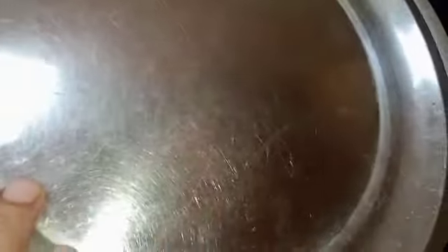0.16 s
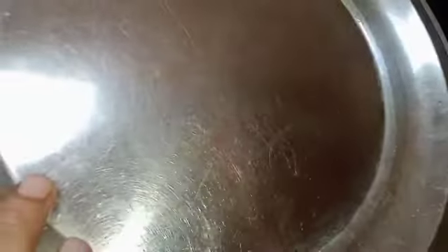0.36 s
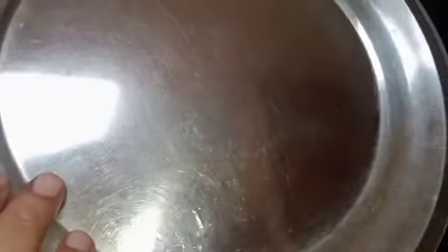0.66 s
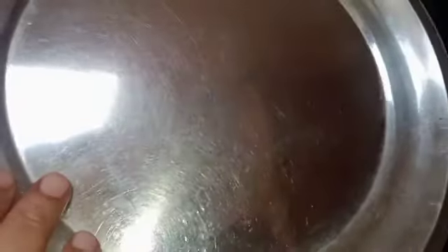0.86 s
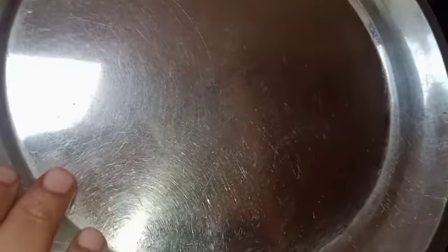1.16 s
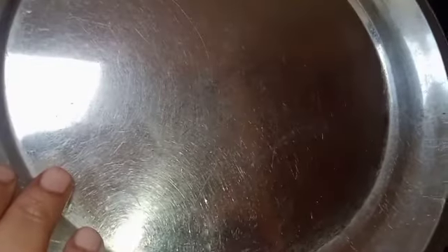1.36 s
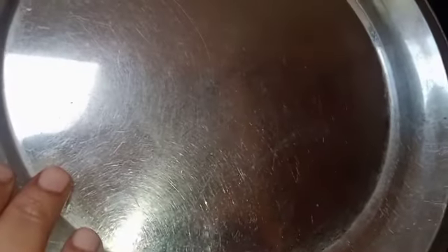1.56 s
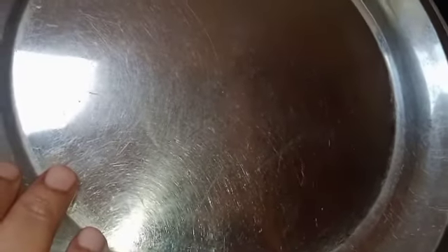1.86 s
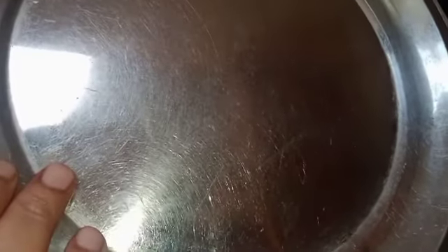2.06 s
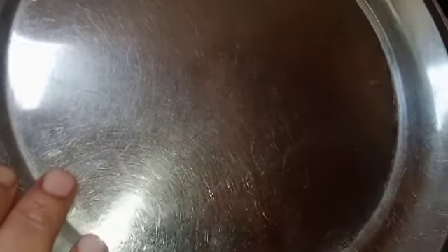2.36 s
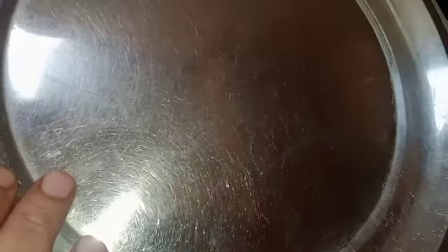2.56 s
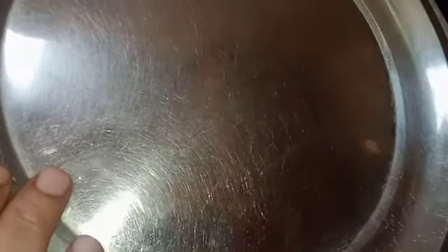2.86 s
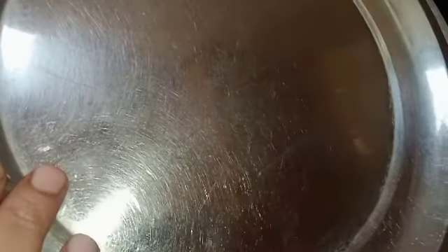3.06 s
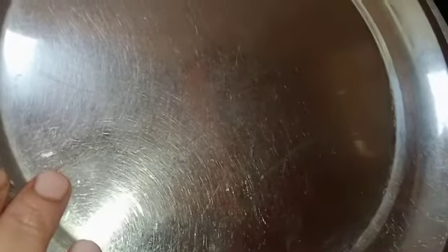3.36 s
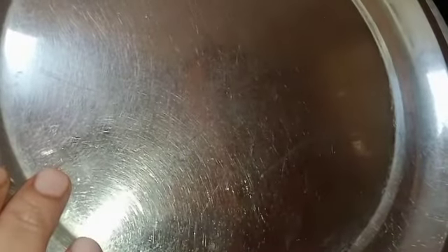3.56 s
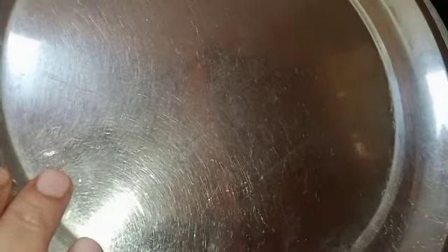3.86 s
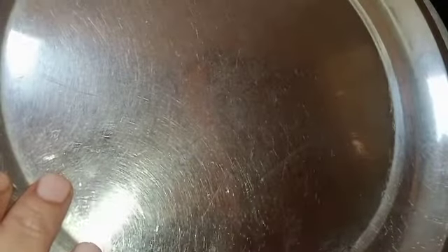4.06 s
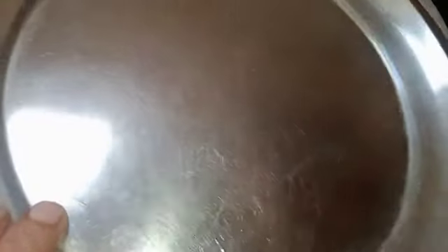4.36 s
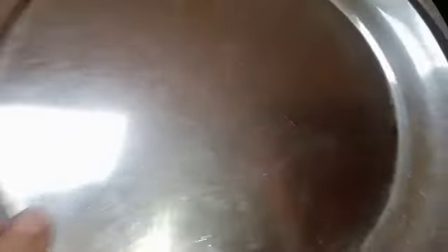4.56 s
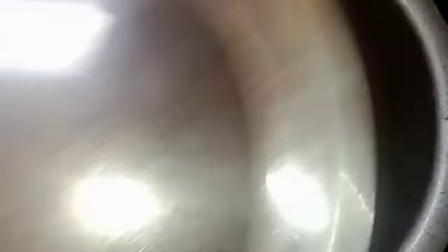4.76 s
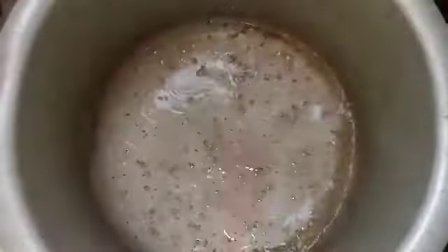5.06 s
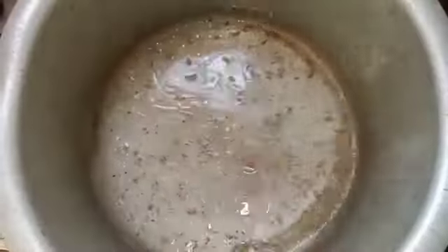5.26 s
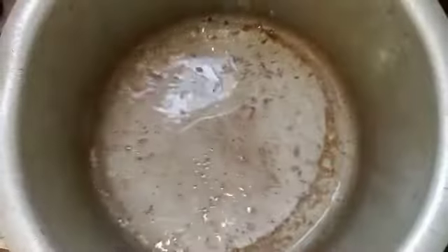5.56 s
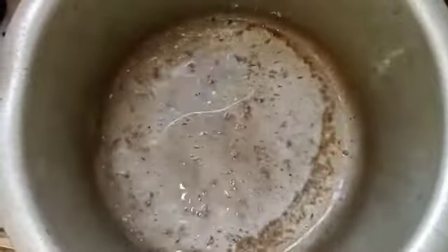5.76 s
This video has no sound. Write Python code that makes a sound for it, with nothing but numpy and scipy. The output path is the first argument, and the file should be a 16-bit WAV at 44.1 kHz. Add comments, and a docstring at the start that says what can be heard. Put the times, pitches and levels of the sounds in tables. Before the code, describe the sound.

One close microphone, identical in both channels, with a short hard-walled kitchen tail. A metal knock opens, followed at once by loud frying hiss and bubbling that rings through a covered steel pot. The sizzle thins into sparse pops and seed-like ticks, a few dull low thuds and one pot knock. Finally the loose plate lands with a bright clatter.

```python
"""Kitchen, one close microphone: water hits hot oil in a steel pot held under a steel plate.
Steam noise and ringing bubble bursts make a dense hiss that dies away; bigger pockets pop with rising pitch.
All of it rings the covered pot. The plate knocks on the rim at the start, is lifted late, and lands at the end
with a rattling clang: noise bursts through damped modes. The pot rocks once; dull sine thuds and quiet
coloured noise lie below."""
import sys
import numpy as np
from scipy import signal
from scipy.fft import rfft, irfft, next_fast_len
from scipy.io import wavfile
from scipy.ndimage import uniform_filter1d

SR = 44100
rng = np.random.default_rng(int(sys.argv[2]) if len(sys.argv) > 2 else 0)


def dump_mix(stems):
    """Bounce the given channels to the path in sys.argv[1] as a 16-bit WAV at rate SR."""
    frames = np.atleast_2d(stems).T  # one column per channel
    limited = np.clip(frames, -1, 1)  # hard clip at full scale
    pcm = np.round(limited * 32767).astype(np.int16)
    wavfile.write(sys.argv[1], SR, pcm)


N = 260631
TIME = np.arange(N) / SR
CLICK = np.eye(1, SR // 2)[0]  # unit impulse, 0.5 s
TOP_HZ = 15830
LIFT_S, LIFT_TAKES_S = 4.56, 0.53  # the plate comes off the pot


def undb(db):
    """dB to amplitude."""
    return 10 ** (np.asarray(db) / 20)


def level(x, db):
    """Scale to an RMS level."""
    return x * undb(db) / np.sqrt(np.mean(x ** 2))


def band(x, hz, width_hz):
    """Two-pole band-pass, gain 1 at the centre."""
    b, a = signal.iirpeak(min(hz, .45 * SR), hz / width_hz, SR)
    return signal.lfilter(b, a, x)


def colour(x, table):
    """Filter by (f/Hz, gain/dB) points joined over log f; -80 dB outside them."""
    hz, db = np.transpose(table)
    size = next_fast_len(N)
    log_f = np.log(np.arange(1, size // 2 + 2) * SR / size)
    gain_db = np.interp(log_f, np.log(hz), db, left=-80, right=-80)
    return irfft(rfft(x, size) * undb(gain_db), size)[:N]


def walk(rate_hz):
    """Random levels held 1 / rate_hz s and joined smoothly; spread near 1."""
    steps = rng.standard_normal(int(rate_hz * N / SR) + 2)
    smooth = uniform_filter1d(np.repeat(steps, 8), size=8)
    smooth = uniform_filter1d(smooth, size=8)
    return 1.3 * np.interp(TIME * rate_hz * 8, np.arange(len(smooth)), smooth)


def fall(t, t60_s):
    """Exponential decay, 60 dB in t60_s."""
    return np.exp(-np.log(1000) * t / t60_s)


def decay(start_s, rise_s, t60_s):
    """Envelope: smooth rise from start_s under a 60 dB fall in t60_s."""
    t = np.maximum(TIME - start_s, 0)
    return (1 - np.exp(-t / rise_s)) ** 2 * fall(t, t60_s)


def ring(x, modes):
    """Sum of damped modes (f/Hz, gain/dB, t60/s), each with that gain at its centre."""
    response = sum(undb(db) * band(CLICK, hz, np.log(1000) / np.pi / t60_s) for hz, db, t60_s in modes)
    return signal.oaconvolve(x, response)[:N]


def random_bursts(per_s, spread_db):
    """Sample indices and gains of random bursts; a negative spread gives near-equal bursts with a few weaker."""
    when, size = rng.random((int(per_s * N / SR), 2)).T
    gain_db = np.minimum(-spread_db * np.log(size + 1e-9), 3 * spread_db)
    return (when * N).astype(int), undb(gain_db)


def uncovering():
    """0 with the plate on, 1 once lifted."""
    return np.clip((TIME - LIFT_S) / LIFT_TAKES_S, 0, 1)


def boil():
    """Hiss, spray, crackle and three bubble families share a level that swells, then dies away."""
    # boil: t/s, hiss level/dB
    heat = [(0.13, -55.5), (0.2, -39.5), (0.27, -30.5), (0.33, -26.5), (0.45, -26), (0.69, -23.5),
            (0.85, -24.5), (1.1, -28.5), (1.45, -30.5), (2.17, -35.5), (2.6, -38), (3.06, -40), (3.79, -42),
            (4.2, -45), (4.48, -49), (4.76, -48.5), (5.03, -44), (5.28, -46.5), (5.43, -49), (5.6, -49.5)]
    # spectra, low to high bubbles, then hiss and spray: f/Hz, relative density/dB
    largest_spectrum = [(150, -25.5), (260, -4.5), (350, 2.5), (480, -1.5), (600, -7.5), (760, -20.5)]
    big_spectrum = [(620, -41), (800, -10), (950, -3.5), (1250, -4.5), (1500, -8.5)]
    middle_spectrum = [(1100, -40), (1400, -2), (1700, 5.5), (2200, 4.5), (2700, -10)]
    hiss_spectrum = [(1290, -33), (2200, -10.5), (2360, -5.5), (2760, -2), (4220, -7), (6410, -5),
                     (7800, -14), (10100, -27), (17200, -120)]
    spray_spectrum = [(4120, -20), (7000, -3), (7520, -4.5), (8250, -10.5), (10300, -13), (13300, -21),
                      (15100, -14), (15900, -13)]
    # shares against the hiss: at landing/dB, settled/dB, settling time/s, drift/(dB/s), change uncovered/dB
    spray_share = (0.5, -15.5, 0.58, 1.5, -6)
    middle_share = (-15, -8, 0.72, 0.97, -5.5)
    big_share = (-28.5, -10, 0.62, -1.16, -3)
    largest_share = (-26.5, -16, 0.82, -0.39, -6.5)

    surge_db = .5 * walk(34.74)
    hiss = fizz(hiss_spectrum, per_s=100., spread_db=2.5, grain_db=-5.5, flicker_db=1.8,
                cycles=38.0, surge_db=surge_db)
    spray = fizz(spray_spectrum, per_s=110.0, spread_db=7.5, grain_db=-7.0, flicker_db=0.5,
                 cycles=11.0, surge_db=0.35 * surge_db)
    middle = fizz(middle_spectrum, per_s=47.0, spread_db=3.0, grain_db=-6.0, flicker_db=4.5,
                  cycles=14.0, surge_db=1.7 * surge_db)
    big = fizz(big_spectrum, per_s=50., spread_db=-2.5, grain_db=0.5, flicker_db=2.34,
               cycles=12., surge_db=0.24 * surge_db)
    largest = fizz(largest_spectrum, per_s=40., spread_db=-3.0, grain_db=1.5, flicker_db=2.3,
                   cycles=17.0, surge_db=0.86 * surge_db)
    mix = hiss + crackle()
    mix = mix + share(*spray_share) * spray + share(*middle_share) * middle
    mix = mix + share(*big_share) * big + share(*largest_share) * largest
    return undb(np.interp(TIME, *np.transpose(heat), left=-70)) * mix


def fizz(spectrum, per_s, spread_db, grain_db, flicker_db, cycles, surge_db):
    """Third-octave families of steam noise and ringing bubble bursts; they flicker alone, surge together."""
    octaves = np.log2(np.array(spectrum)[:, 0])
    top = min(octaves[-1], np.log2(TOP_HZ)) + 1 / 3
    out = 0
    for hz in 2 ** np.arange(octaves[0], top, 1 / 3):
        index, gain = random_bursts(per_s, spread_db)
        bursts = np.zeros((2, N))
        bursts[np.arange(len(index)) % 2, index] = gain
        # alternate bursts ring a semitone above and below
        blips = band(bursts[0], hz * 2 ** (1 / 12), hz / cycles)
        blips = blips + band(bursts[1], hz / 2 ** (1 / 12), hz / cycles)
        steam = level(band(rng.standard_normal(N), hz, hz / 2.53), 0)
        family = steam + level(blips, grain_db)
        # sqrt(hz): equal density per Hz before colouring
        out = out + family * np.sqrt(hz) * undb(flicker_db * walk(21.88) + surge_db)
    return level(pot(colour(out, spectrum)), 0)


def share(landing_db, settled_db, settle_s, drift_db_per_s, uncovered_db):
    """Gain against the hiss: settles after the pour, drifts, wanders and shifts as the plate lifts."""
    pour_s, wander_db = 0.15, 1.42
    t = np.maximum(TIME - pour_s, 0)
    settling_db = (landing_db - settled_db) * np.exp(-t / settle_s)
    steady_db = settled_db + drift_db_per_s * t + uncovered_db * uncovering()
    return undb(steady_db + settling_db + wander_db * walk(6.0))


def crackle():
    """Seeds and droplets snap: short band-passed ticks, louder against the hiss once the plate is off."""
    index, gain = random_bursts(per_s=110., spread_db=2.5)
    ticks = np.zeros(N)
    ticks[index] = gain
    snaps = pot(band(band(ticks, 3500.0, 1500.), 3550.0, 1500.))
    return level(snaps, -16) * undb(5.5 * uncovering())


def pockets():
    """Single steam pockets pop; higher ones die at nearly the same rate but ring purer."""
    # pops before the pot: t/s, peak/dB, f/Hz
    pocket_table = [(0.213, -27, 4700), (0.68, -43, 354), (0.721, -24, 1576), (0.74, -40, 343),
                    (0.798, -42, 358), (0.869, -29, 1110), (0.93, -34.5, 1012), (1.039, -47, 342),
                    (1.161, -45, 355), (1.223, -38, 1013), (1.346, -37, 345), (1.39, -35.5, 371),
                    (1.627, -35, 1023), (1.7, -33.5, 393), (1.903, -38.5, 389), (2.0616, -33.5, 1590),
                    (2.132, -44.5, 956), (2.54, -46, 1033), (2.548, -41, 575), (2.8932, -26.5, 2744),
                    (2.932, -41.5, 1015), (3.2214, -33, 2420), (3.394, -31, 2880), (3.5405, -33.5, 3020),
                    (3.563, -41, 1000), (3.585, -42.5, 1020), (3.5988, -32, 1790), (3.7557, -32, 2890),
                    (3.841, -32, 2180), (3.887, -37, 1514), (3.953, -36, 1576), (3.995, -41.5, 1020),
                    (4.086, -37.5, 2730), (4.2397, -38, 1548), (4.2996, -37.5, 3220), (4.416, -43, 361),
                    (4.545, -38.5, 2640), (4.575, -43, 2720), (4.803, -44, 4500), (4.916, -49.5, 450),
                    (4.944, -36, 3800), (4.99, -36, 3820), (5.0594, -33, 2520), (5.08, -35.5, 2650),
                    (5.1272, -40, 2160), (5.1895, -41, 2740), (5.215, -37.5, 2173), (5.229, -42, 1614),
                    (5.3123, -38, 2670), (5.3424, -36, 2560), (5.3896, -41, 3250), (5.487, -42.5, 2794)]
    t60_s, q = 0.11, 2.23  # at 1 kHz
    t60_power, q_power = -0.034, 0.44  # of pitch
    rows = []
    for s, db, hz in pocket_table:
        khz = hz / 1000
        rows.append((s, db, hz, t60_s * khz ** t60_power, q * khz ** q_power))
    return pops(rows, tone_db=-1.5, rise_s=0.0024, climb_octaves=0.15)


def gulp():
    """One hollow gulp: a low bubble whose pitch climbs far."""
    # gulp before the pot: t/s, peak/dB, f/Hz, t60/s, Q per pass
    gulp_table = [(3.598, -36, 419, 0.12, 4.2)]
    return pops(gulp_table, tone_db=2.0, rise_s=0.014, climb_octaves=1.4)


def pops(rows, tone_db, rise_s, climb_octaves):
    """Each pop is a shrinking bubble, pitch climbing as it dies, with a puff of steam."""
    out, size = np.zeros(N), SR // 4
    t = np.arange(size) / SR
    for s, db, hz, t60_s, q in rows:
        puff = band(band(rng.standard_normal(size), hz, hz / q), hz, hz / q)
        pitch_hz = hz * 2 ** (climb_octaves * np.minimum(t / t60_s, 1))
        tone = np.sin(2 * np.pi * np.cumsum(pitch_hz) / SR)
        envelope = (1 - np.exp(-t / rise_s)) * fall(t, t60_s)
        pop = (puff / puff.std() + undb(tone_db) * tone) * envelope
        pop = pop * undb(db) / np.abs(pop).max()
        start = int(s * SR)
        out[start:start + size] += pop[:N - start]
    return out


def plate():
    """A loose steel plate rattles as it lands: dense contact noise, heard bare and through its modes."""
    # contacts: t/s, bare level/dB, rise/s, t60/s, added treble/dB, drive into modes/dB
    knocks = [(5.6333, -21, 0.0013, 0.12, -2, 0), (5.644, -25, 0.0031, 0.11, -12, 8),
              (5.728, -50, 0.0033, 0.091, 3, -4), (5.787, -18.5, 0.0049, .18, 10.5, 2.5),
              (5.841, -11, 0.02, 0.14, 12, 3)]
    # plate modes: f/Hz, gain/dB, t60/s
    plate_modes = [(281, 16, 0.3), (582, 13, 0.12), (780, 19.5, 0.084), (1057, 6, 0.13), (998, 12.5, 0.058),
                   (1245, 5, 0.14), (1357, 0, 0.32), (1490, -6, .08), (1680, 2, 0.068), (1746, 7, 0.077),
                   (2320, 0, 0.074), (2180, 1, 0.083), (2340, 3, .08), (2540, -4, 0.071), (2930, 6, 0.057),
                   (3500, 3, 0.1), (3600, -12, 0.073), (4140, 3, 0.097), (4670, -1, 0.056),
                   (5640, 1, 0.034), (6288, 2, 0.029), (7500, 1, 0.018)]
    # contact noise: f/Hz, relative density/dB
    clang_spectrum = [(120, -62), (200, -15.5), (278, -9.5), (316, -8.5), (681, -20.5), (999, -9),
                      (1180, -6), (2230, -0.5), (3460, -6.5), (6330, -8), (15800, -35)]
    rattle = level(colour(rng.standard_normal(N), clang_spectrum), 0) * undb(2.0 * walk(200))
    treble = band(rattle, 8800.0, 7000.0)
    bare, drive = 0, 0
    for s, db, rise_s, t60_s, treble_db, ring_db in knocks:
        body = rattle * decay(s, rise_s, t60_s)
        bright = undb(treble_db) * treble * decay(s, rise_s, 0.25 * t60_s)  # treble dies first
        blow = undb(db) * (body + bright)
        bare = bare + blow
        drive = drive + undb(ring_db) * blow
    return bare + ring(drive, plate_modes)


def rim():
    """The plate shuts on the rim: a crack, broad and dull together, and the rim's damped modes."""
    # rim modes: f/Hz, gain/dB, t60/s
    rim_modes = [(367, 6.5, 0.63), (543, -15, 0.035), (1550, 7.5, 0.24), (1574, -1, 0.25),
                 (2800, -12, 0.035), (3950, -7, 0.1), (4250, -10, 0.027), (5570, -5.5, 0.058),
                 (6620, -12, 0.035)]
    blow = rng.standard_normal(N) * decay(0.019, rise_s=0.00034, t60_s=.15)
    broad = band(blow, 2100.0, 2700.0)
    dull = undb(11.0) * band(blow, 400.0, 500.0)
    return undb(-29) * (broad + dull + undb(26) * ring(blow, rim_modes))


def rocks():
    """The pot rocks on its stand: each contact pushes the base modes and adds a rough noise burst."""
    # contacts: t/s, push level/dB, rough noise re push/dB, noise t60/s
    contacts = [(3.267, -36.5, 14, 0.072), (3.285, -34, 3, 0.053), (3.341, -24, -8, .07),
                (3.358, -27.5, 2.5, 0.088), (3.395, -41, 12, 0.072)]
    # base modes: f/Hz, gain/dB, t60/s
    base_modes = [(366.5, 3.5, 0.29), (525, -15, 0.15), (804, -13.5, 0.055), (927, -4.5, 0.11),
                  (985, -9, 0.08), (1291, -7, 0.24), (1680, -10, 0.1), (2900, -7, 0.1), (3600, -10, 0.065)]
    push, rough = np.zeros(N), 0
    grit = band(rng.standard_normal(N), 650.0, 940.0)
    for s, db, rough_db, t60_s in contacts:
        push[int(s * SR)] = undb(db)
        rough = rough + undb(db + rough_db) * grit * decay(s, 0.0011, t60_s)
    push = signal.lfilter(*signal.butter(2, 2500., fs=SR), push)  # soften
    return undb(50) * ring(push, base_modes) + rough


def pot(x):
    """The air and steel of the covered pot lift their own pitches."""
    # resonances: f/Hz, width/Hz, lift of each alone/dB
    pot_modes = [(349, 24, 9), (555, 70, 3.5), (1018, 25, 12.5), (1063.5, 21, 12), (1302, 14, 8),
                 (1572.3, 31, 14.5), (1942, 26, 8), (2157, 31, 9), (2250, 63, 6), (2480, 19, 8.5),
                 (2560, 38, 6.5), (2694, 66, 8), (2838, 29, 5.5), (3000, 150, 4.5), (3270, 18, 8),
                 (3910, 28, 5.5), (4544, 40, 9), (5740, 130, 3), (6430, 330, 2)]
    response = CLICK + sum((undb(db) - 1) * band(CLICK, hz, width_hz) for hz, width_hz, db in pot_modes)
    return signal.oaconvolve(x, response)[:N]


def room(x):
    """Hard kitchen walls answer with a short diffuse tail."""
    t = np.arange(SR // 2) / SR
    tail = band(rng.standard_normal(len(t)), 1550.0, 4600.0) * fall(t, t60_s=0.32)
    tail = tail * (t > .006)  # first echo after 6 ms
    tail = tail / np.sqrt(np.sum(tail ** 2))
    return x + undb(-15) * signal.fftconvolve(x, tail)[:N]


def thuds():
    """Low damped swings of the stove top."""
    # thuds: t/s, level/dB, f/Hz, t60/s
    thud_table = [(2.235, -33, 83, 0.15), (2.563, -41, 94, 0.21), (3.729, -40, 98, 0.087)]
    return sum(undb(db) * decay(s, 0.0027, t60_s) * np.sin(2 * np.pi * hz * (TIME - s))
               for s, db, hz, t60_s in thud_table)


def kitchen():
    """Quiet kitchen: coloured noise whose level wanders."""
    # background: f/Hz, relative density/dB
    kitchen_spectrum = [(25, -31), (60, -1), (100, 4.5), (160, 2.5), (300, -11.5), (1000, -4.5),
                        (4000, -11), (12000, -47), (15500, -29)]
    return level(colour(rng.standard_normal(N), kitchen_spectrum), -61.5) * undb(1.5 * walk(4))


def scene():
    """Boil direct; pops and steel with room tail; thuds and kitchen below; both channels alike."""
    struck = plate() + rim() + rocks()
    mono = boil() + room(pot(pockets() + gulp()) + struck) + thuds() + kitchen()
    return np.array([mono, mono])


def record(dry):
    """The microphone loses the deepest bass, rounds the loudest peaks and cuts the top."""
    ceiling = 0.36  # amplitude that peaks round off towards
    dry = signal.sosfilt(signal.butter(2, 55., "high", fs=SR, output="sos"), dry)
    dry = ceiling * np.tanh(dry / ceiling)
    return signal.sosfilt(signal.ellip(10, .2, 80, TOP_HZ, fs=SR, output="sos"), dry)


dry = scene()
out = record(dry)
dump_mix(out)
```